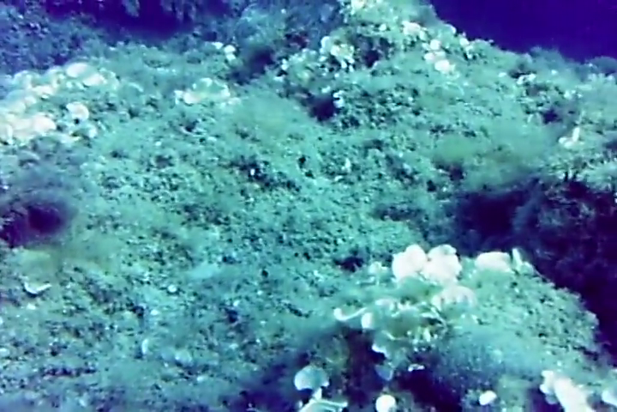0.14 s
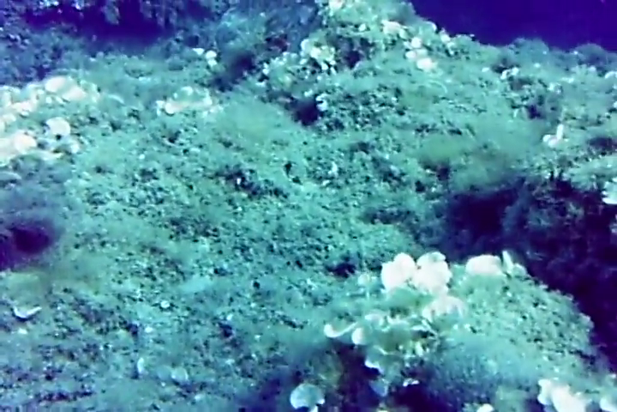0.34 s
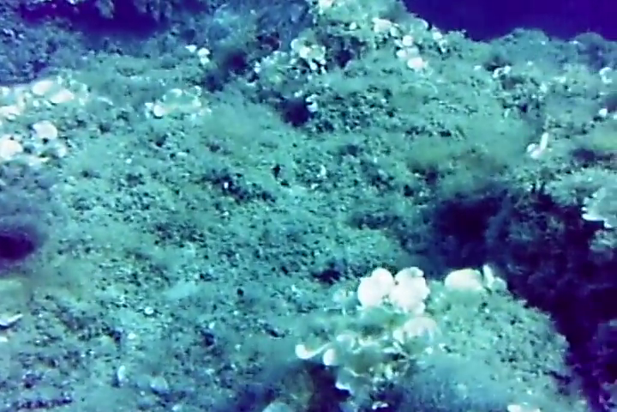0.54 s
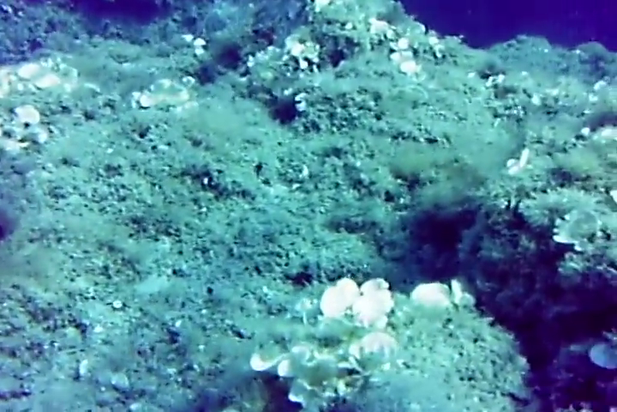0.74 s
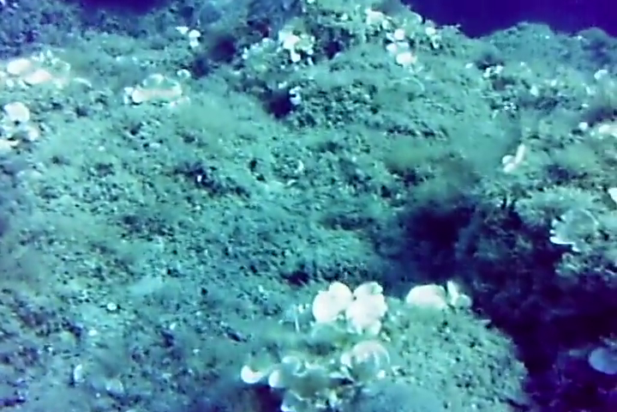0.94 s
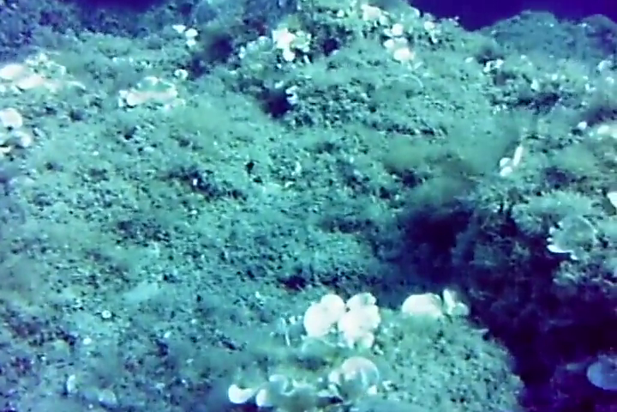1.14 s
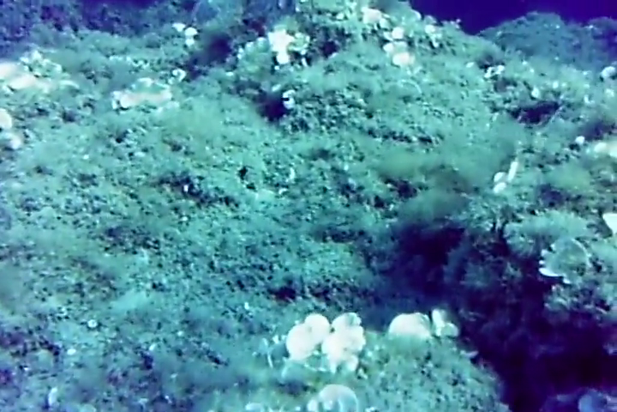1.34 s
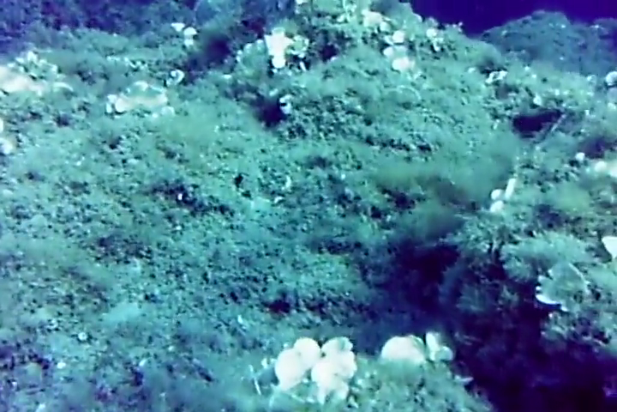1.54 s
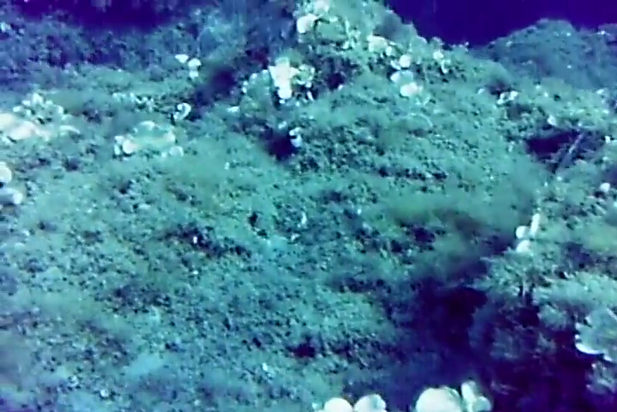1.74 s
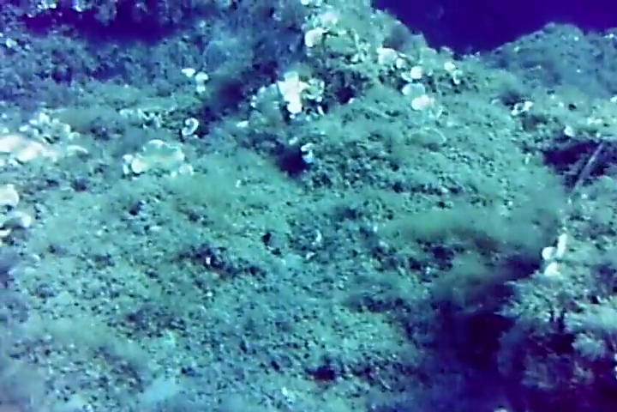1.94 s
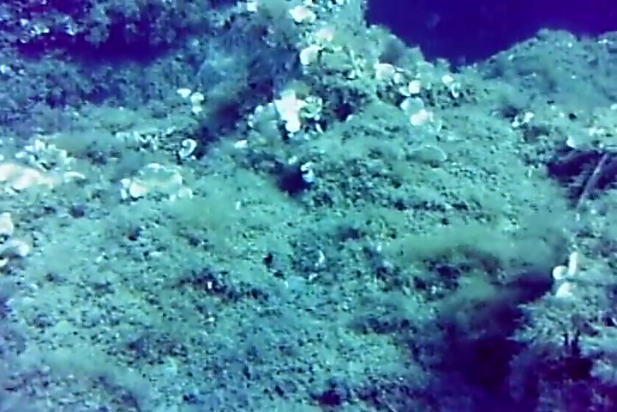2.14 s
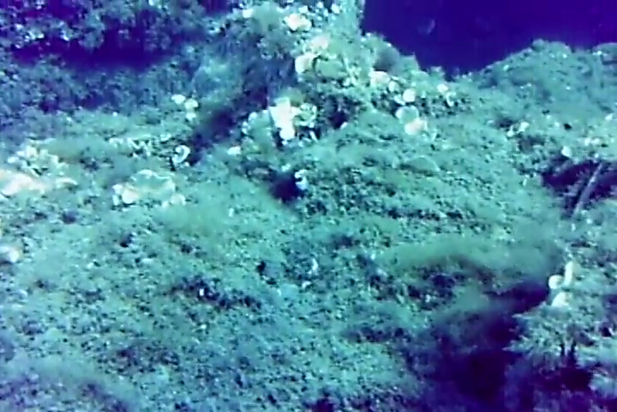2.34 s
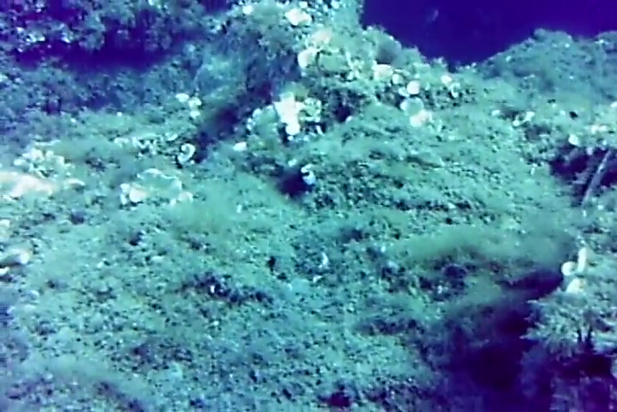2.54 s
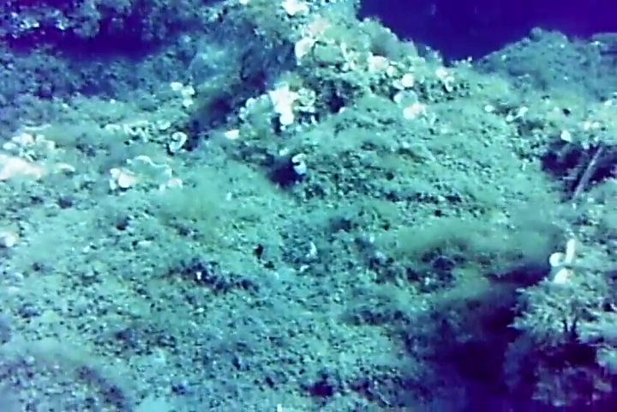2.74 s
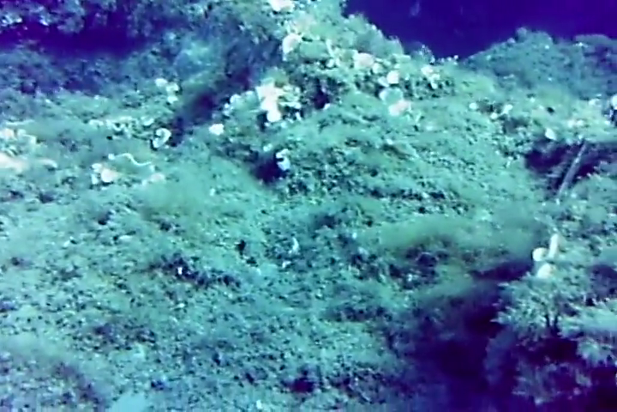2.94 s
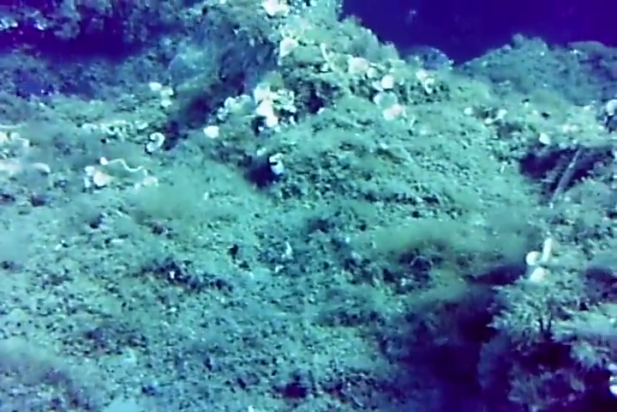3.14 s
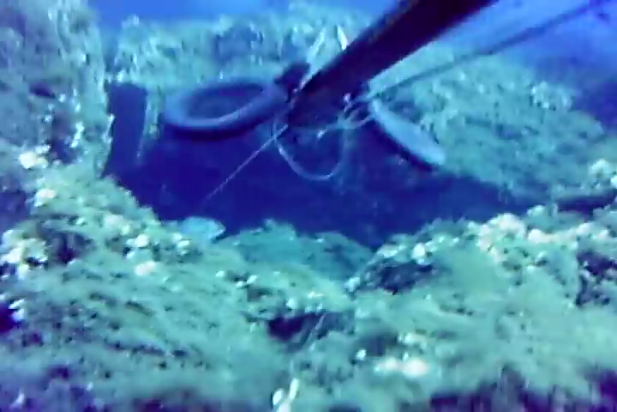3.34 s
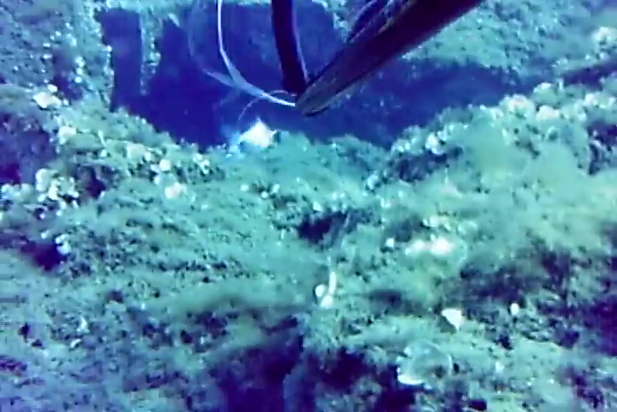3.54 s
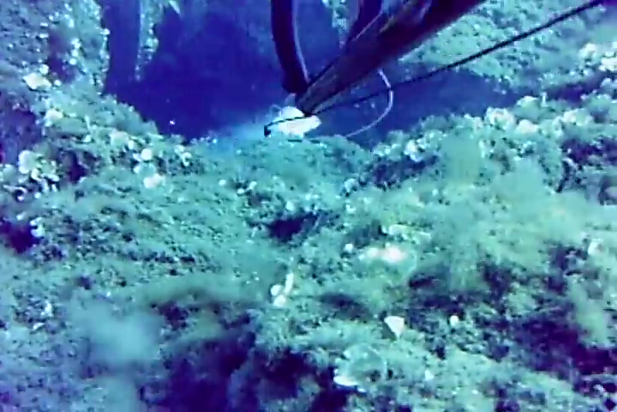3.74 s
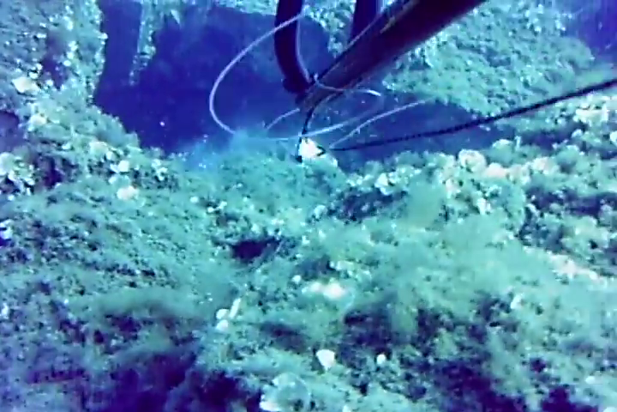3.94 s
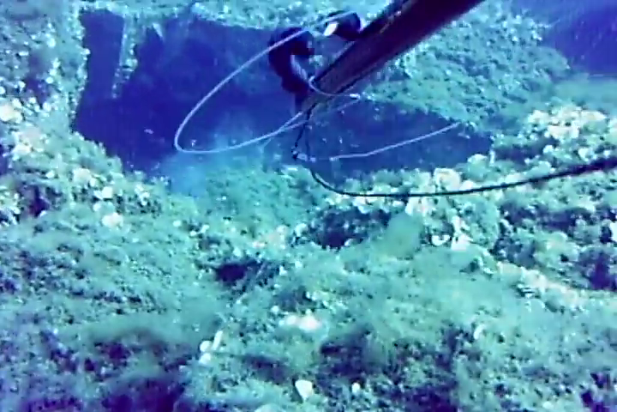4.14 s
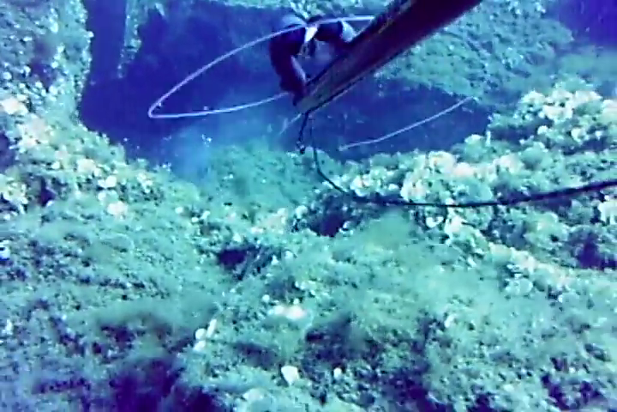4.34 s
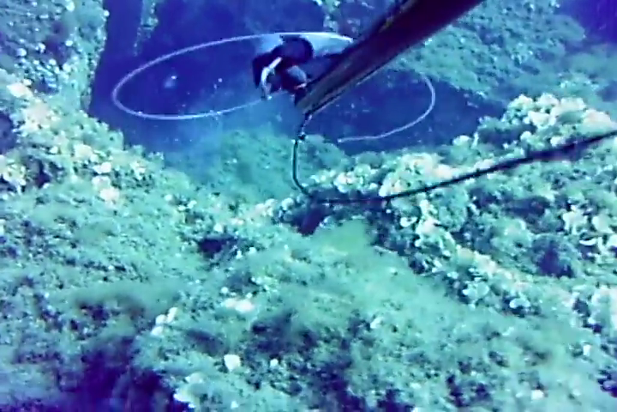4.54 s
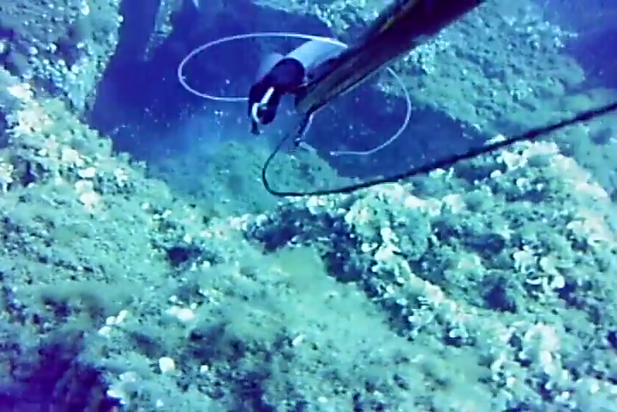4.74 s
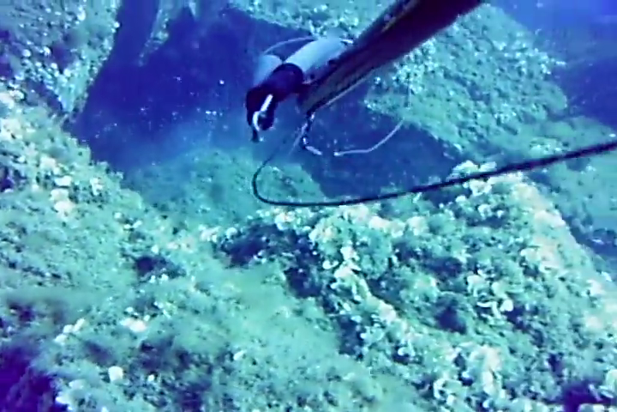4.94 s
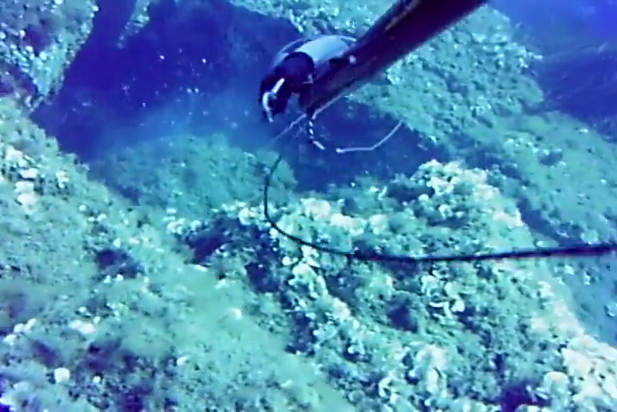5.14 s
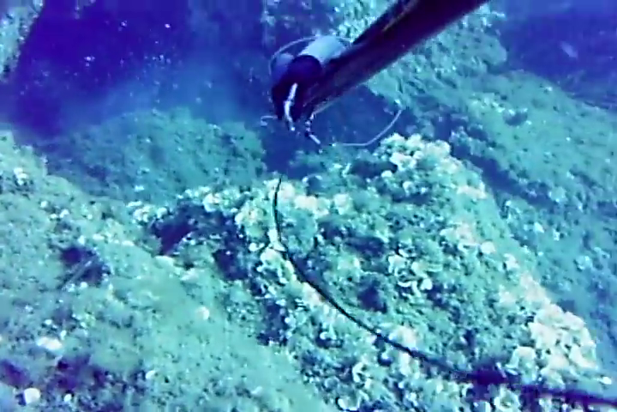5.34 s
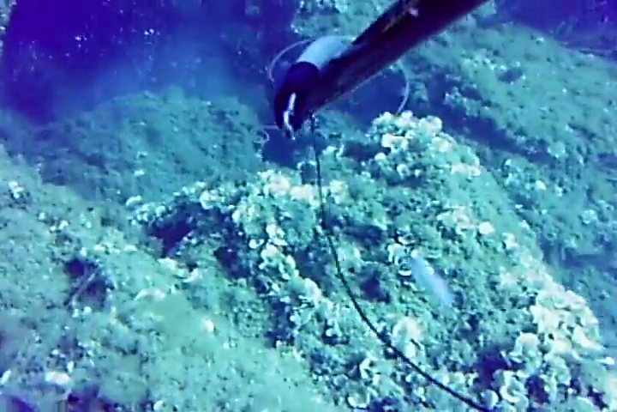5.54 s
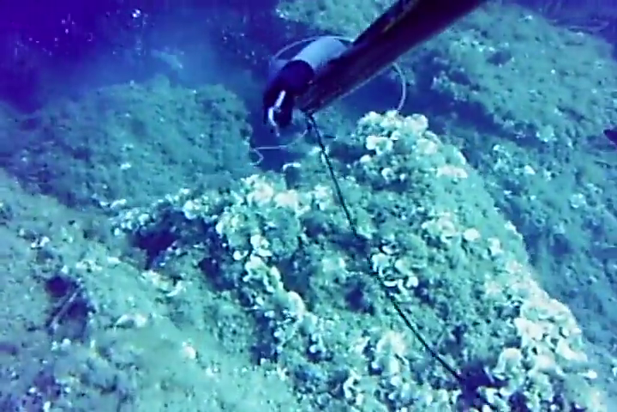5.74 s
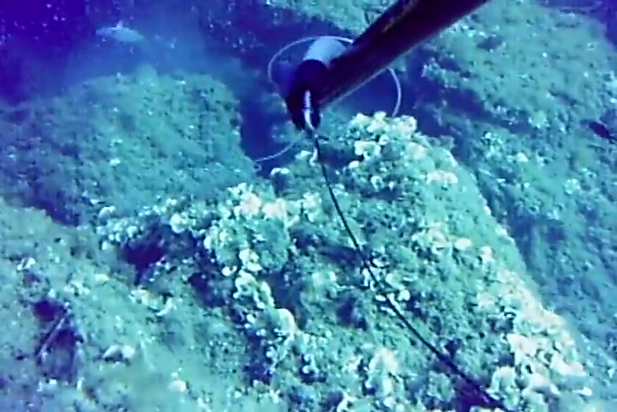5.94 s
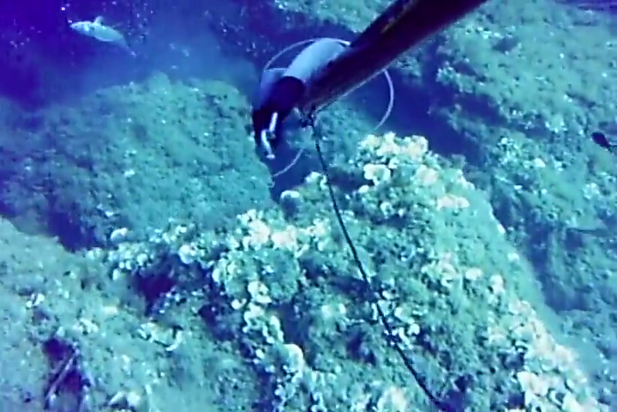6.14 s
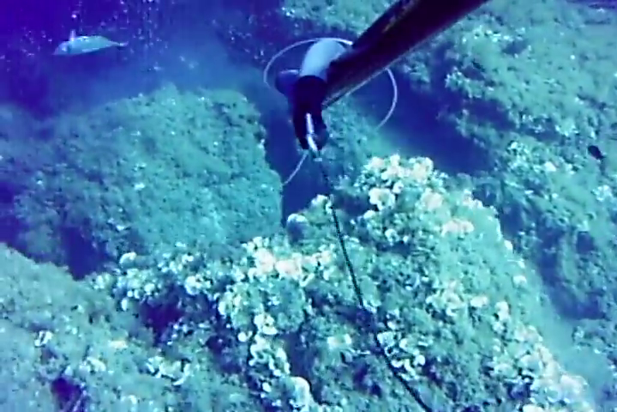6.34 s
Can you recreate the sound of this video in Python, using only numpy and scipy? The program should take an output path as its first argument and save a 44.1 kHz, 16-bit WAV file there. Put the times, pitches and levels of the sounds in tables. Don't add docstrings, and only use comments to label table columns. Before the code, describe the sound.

Heard from inside a sealed camera housing under water: steady thin hiss with faint crackle and sparse plastic ticks, growing busier around one and a half seconds. Just after three seconds a speargun fires beside it, a short clipped crack and rush that overloads the microphone. Slack rubbers slap, then line flicks, little squeaks, rubbing and boxy knocks continue, thinning toward the end.

```python
import sys
import numpy as np
from scipy import signal
from scipy.fft import rfft, irfft
from scipy.io import wavfile
from scipy.ndimage import uniform_filter1d

SR = 44100
rng = np.random.default_rng(int(sys.argv[2]) if len(sys.argv) > 2 else 0)


def elevation(decibels):
    levels = np.asarray(decibels, float)
    return 10 ** (levels / 20)


def wav_record(signal):
    frames = np.transpose(np.atleast_2d(signal))
    bounded = np.clip(frames, -1, 1)
    quanta = np.round(bounded * 32767).astype(np.int16)
    wavfile.write(sys.argv[1], SR, quanta)


N = 286209

# (centre [Hz], width [Hz], level [dB])
THUD = [(277, 33, -5.5), (391.6, 44, -2.5), (538, 25, 4.5)]
BODY = [(770, 120, -3.5), (1191.4, 150, -1), (1320, 115, 1.5)]
TICK = [(2244, 395, -1), (2850, 480, 0.27), (3730, 3000, -1.5)]
# (frequency [Hz], density [dB per Hz])
HISS_SPECTRUM = [(18, -44), (30, 3.5), (336, -5.5), (844, -4), (2200, -7), (4000, -6.5), (5200, -43),
                 (8800, -120)]
# (centre [Hz], width [Hz], level [dB])
HISS_PEAKS = [(520, 28, 0.5), (1300, 160, -8), (1585, 110, -6), (2830, 110, -15), (3275, 81, 0),
              (3900, 45, -23)]
# (time [s], length [s], level [dB], drift [dB over the length], treble [dB])
RUSTLES = [(0.003, 0.056, -38, 2, -11), (0.059, 0.16, -36.5, -1.5, -38.5), (0.237, 0.024, -52, 1, -12),
           (0.981, 0.2, -39, 5, -22), (1.251, 0.0067, -40, 2, -0.5), (1.476, 0.039, -41.5, 8.5, -3),
           (1.531, 0.039, -39.5, -8, 1), (1.985, 0.068, -31, -8, -31), (2.065, 0.13, -43.5, 10, -9),
           (2.975, 0.18, -40, 4, -11.5), (3.1705, 0.018, -20, -11.5, -8), (3.368, .052, -28, -6, 4),
           (3.428, .016, -33, -2, 0), (3.345, .02, -34, -3, 3), (4.056, 0.006, -41, -3, 6),
           (4.086, 0.022, -34.5, -1, 0.5), (4.55, .13, -37.5, 1, -5), (4.99, .12, -36, 0, -4),
           (1.5, .08, -42, 0, 2)]
# (time [s], peak [dB], pitch [Hz], decay t60 [s])
SNAPS = [(.0413, -5.5, 2230, 0.0021), (.0413, -5, 3700, 0.0038), (1.5788, -7.5, 1500, 0.0011),
         (1.6878, -17, 495, 0.0072), (1.688, -11.5, 1930, 0.0013), (6.214, -27, 2800, .004),
         (1.6885, -8.5, 3960, 0.014), (4.5745, -18, 3850, 0.011), (5.583, -21.5, 2900, 0.0073),
         (1.2445, -22, 2000, 0.0012), (1.2995, -24, 2200, 0.0014), (1.5, -23, 2500, 0.0016),
         (1.516, -26, 1800, .0015), (1.196, -27, 900, .012), (1.091, -28, 2900, .006),
         (5.0132, -15, 900, .004), (4.488, -23, 3950, .012), (4.7615, -21, 2500, .0015),
         (4.914, -28, 2100, .004), (4.906, -29, 2400, .006), (4.512, -28, 1700, .01),
         (5.056, -24, 1250, .012), (5.023, -24, 800, .012), (6.4345, -28, 3300, .006),
         (6.4375, -28, 3300, .004), (1.6505, -21, 2200, .0015), (1.7315, -23, 1800, 0.0014),
         (1.486, -28, 1400, .005), (1.493, -26, 1300, .005), (1.535, -24, 1800, .003),
         (1.259, -39, 3300, .008), (6.048, -28, 3000, .006), (5.557, -29, 2900, .004),
         (3.3132, -5, 1500, .002), (3.4775, -27, 2000, .003), (3.6185, -28, 2300, .003),
         (4.052, -24, 3000, .003)]
# (time [s], peak [dB], pitch [Hz], hardness [dB])
EARLY_TICKS = [(0.042, -19, 1320, 9), (0.053, -36, 520, 8), (0.609, -24, 3300, -8), (1.08, -23, 1380, 5),
               (1.2445, -18, 2790, -4), (1.299, -21, 3170, -4), (1.33, -17, 2880, -5),
               (1.337, -15.5, 3500, -2), (1.478, -23, 1340, 6), (1.515, -17, 2860, -8),
               (1.553, -18, 2770, -16), (1.562, -13.5, 2840, 7), (1.579, -9.5, 1022, 25),
               (1.65, -13.5, 3100, -2), (1.656, -18, 2850, -2), (1.688, -9.5, 2860, -9.5),
               (1.731, -17.5, 2860, 3), (1.912, -35.5, 537, -5), (1.976, -28.5, 527, -23),
               (2.187, -18.5, 3000, -1), (2.444, -26, 3320, -11), (2.84, -25.5, 2870, -13),
               (2.992, -30, 590, -27)]
# (time [s], length [s], level [dB], place [octaves above the hum], loss [dB per octave squared])
RUBS = [(3.4, 2.9, -47, 0.38, 5), (3.33, .008, -34.5, 0.5, 1.5), (3.36, 0.22, -40, -0.16, 2.5),
        (3.625, 0.024, -38.5, -1.1, 11), (.1, 0.78, -51, 1.4, 8), (3.94, 0.046, -36.5, 0.8, 4.5),
        (4.082, 0.081, -36, 2.8, 0), (4.216, 0.18, -40.5, 0.7, 3), (4.487, 0.064, -36.5, 1.3, 0),
        (4.592, 0.088, -32.5, 1, 4.5), (4.743, 0.18, -39.5, 0.99, 3), (5.005, 0.15, -37.5, 1.5, 2.5),
        (5.206, 0.077, -46, 0.5, 14.5), (5.46, 0.0084, -41, 0.7, 5.5), (5.59, .01, -38, 0.1, 3.5),
        (5.717, .02, -45, 1, 1.5), (6.023, 0.08, -36, 0.3, 2), (6.095, 0.03, -37, -0.64, 0.5),
        (6.249, .12, -34.5, -0.3, 2.5), (6.48, .02, -37, -0.8, 3.5)]
# (mount centre [Hz], mount width [Hz], share [dB])
MOUNT = [(305, 70, -2), (520, 630, -2.5), (1250, 1400, 0.5), (2203, 3600, -4)]
# (time [s], peak [dB], pitch [Hz], decay t60
# [s])
FLICKS = [(3.5295, -18.5, 900, 0.0074), (3.5705, -24, 935, .01), (3.6175, -20.5, 990, 0.016),
          (4.16, -14.5, 967, 0.014), (5.1284, -6.5, 890, 0.0053), (5.137, -15, 760, 0.01),
          (5.202, -9.5, 895, 0.0076), (3.4235, -19, 620, .015), (3.8215, -30, 370, .04),
          (3.823, -27, 1000, .02), (3.605, -33, 245, .12), (3.52, -36, 250, .1), (3.685, -35, 265, .08),
          (3.55, -32, 430, .06), (3.70, -35, 420, .08), (6.469, -32, 1300, .03), (6.476, -31, 1100, .02),
          (6.485, -27, 700, .03), (3.441, -20, 900, .008), (3.931, -29, 520, .06), (3.956, -26, 1270, .03),
          (4.104, -22, 1000, .03), (5.591, -24, 850, .02), (5.59, -28, 2900, .015), (5.842, -31, 1300, .02),
          (4.212, -32, 525, .1), (4.829, -27, 1250, .03), (4.864, -27, 500, .03), (4.893, -27, 1250, .025),
          (4.876, -29, 1300, .02), (4.932, -29, 1200, .03), (4.571, -27, 1250, .02), (4.14, -33, 130, .1),
          (3.15, -36, 62, .15)]
# (time [s], peak [dB], pitch [Hz],
# hardness [dB])
SLIPS = [(3.1682, -3, 2350, -0.5), (3.4183, -23, 2850, 0), (4.056, -18, 3890, -8), (4.4876, -16, 3000, 8),
         (4.551, -19, 1800, -5.5), (3.589, -31, 3500, 6), (4.761, -17, 3340, 11), (4.8933, -28, 2290, -1.5),
         (4.951, -21, 2160, -15), (4.991, -13, 1740, -5), (4.9938, -16.5, 2240, -10),
         (5.0024, -17.5, 1940, 1), (5.0195, -16.5, 1830, 6), (5.0272, -16, 2300, 3), (5.0446, -15, 2150, 3),
         (5.053, -17.5, 2280, -2), (5.121, -25.5, 2400, 2), (5.128, -21, 2200, -2), (5.203, -25, 2300, 0),
         (4.563, -21, 2200, 1), (4.664, -19, 2000, -4), (4.700, -23, 3200, 5), (5.1434, -19.5, 2220, 7),
         (6.035, -23.5, 3230, 0)]
# (time [s], peak before overload [dB], pitch [Hz], decay t60 [s])
RECOIL = [(3.1925, -4, 1517, 0.013), (3.1944, 21.5, 309.5, 0.026), (3.198, 25, 1317, 0.038),
          (3.2005, 19.5, 411, 0.019), (3.203, 13, 1334, 0.032), (3.2115, 18.5, 610, 0.025),
          (3.216, 22, 1112, 0.022), (3.2195, 17, 545.4, .03), (3.2235, 20, 2895, 0.02),
          (3.226, 20, 3800, 0.02), (3.229, 19.5, 3605, .015), (3.256, 9.5, 4020, .015),
          (3.2655, 0, 604, .03), (3.268, -2, 1151, .012), (3.2322, 25, 253.4, 0.012),
          (3.237, 23.5, 1150, 0.04), (3.2465, 19, 1200, 0.03), (3.251, 14.5, 580, 0.052),
          (3.259, 11.5, 289.5, 0.022), (3.26, -14, 1197, 0.05), (3.271, 1, 2315, 0.025),
          (3.2824, 6, 1295, 0.046), (3.2945, 7, 520, 0.01), (3.299, -11, 963, 0.025),
          (3.3035, -11, 560, 0.039), (3.3065, -6, 620, .04), (3.3127, 5, 704, 0.0076),
          (3.3155, -3, 600, .04), (3.302, -17, 3900, .03), (3.3255, 4, 1193, 0.016),
          (3.327, -5, 2325, 0.013), (3.34, -17, 2450, 0.02)]
# (time [s], length [s], level before overload [dB], drift [dB over the length])
GUSTS = [
    (3.1982, 0.034, 19, 0.5),
    (3.238, 0.022, 17, -6),
    (3.286, 0.0096, 8, -13.5),
    (3.277, .005, -16, -0.5),
    (3.301, 0.022, -10, -1.5),
    (3.333, .012, -17, -1),
    (3.369, 0.043, -20, -18),
    (3.423, 0.022, -19.5, -5.5),
]
# (time [s], level [dB])
SURGE = [
    (3.193, 0),
    (3.196, 14),
    (3.262, 12),
    (3.274, 0),
    (3.282, 0),
    (3.284, 6),
    (3.293, 0),
]
# (time [s], peak [dB], pitch [Hz], hardness [dB])
REBOUNDS = [
    (3.375, -5, 1337, -1),
    (3.44, -26, 704, -9),
    (3.529, -20, 752, -10),
    (3.617, -21, 750, -16),
]
# (centre time [s], peak [dB], pitch [Hz], half length [s])
SQUEAKS = [(3.380, -18, 2275, 0.004), (3.4294, -16, 1300, 0.004), (3.431, -17, 550, 0.011),
           (3.958, -27, 1275, 0.004), (3.9645, -28, 1275, .004), (4.207, -23.5, 1250, 0.0062),
           (4.3745, -22.5, 1300, 0.0044), (4.4915, -15, 1275, 0.0045), (4.508, -29, 525, 0.019),
           (4.517, -24, 1200, 0.0044), (4.545, -24, 1200, 0.0046), (4.557, -19.5, 1300, .005),
           (4.5945, -21.5, 1225, .004), (4.603, -24, 1230, .005), (4.613, -22, 1250, 0.0045),
           (4.6215, -20, 1300, 0.0045), (4.635, -10.5, 1225, .0035), (4.6515, -15, 1200, 0.0036),
           (4.6695, -15.5, 1225, 0.0043), (4.682, -19, 1250, 0.0078), (4.593, -29, 2250, 0.0073),
           (4.629, -25.5, 2250, 0.0066), (4.648, -27, 2250, 0.0027), (4.763, -28.5, 525, 0.025),
           (4.7785, -21, 1300, .004), (4.996, -21.5, 1300, .003), (5.021, -23, 1000, .005),
           (5.046, -24.5, 1250, .003), (5.06, -28, 1250, .004), (5.0743, -13, 2175, .004),
           (5.093, -17.5, 1900, .003), (5.0935, -22, 1050, .003), (5.101, -17, 2200, 0.0029),
           (5.179, -27, 1200, 0.0029), (5.5915, -25, 575, 0.008), (5.733, -33, 1250, .008),
           (5.781, -29, 1250, .004), (5.887, -32.5, 1250, 0.005), (6.010, -29, 525, 0.018),
           (6.071, -29.5, 1200, .004), (6.109, -24.5, 575, .004), (6.1155, -21.5, 1225, .004),
           (6.125, -24, 1225, 0.0044), (6.227, -25, 1225, .003), (6.239, -25.5, 1225, .004),
           (6.263, -28.5, 500, .004), (6.292, -25, 525, .01), (6.344, -22, 1200, .005),
           (6.348, -27.5, 550, 0.0048), (6.358, -29, 1200, .005)]
# (centre time [s], peak [dB], pitch [Hz], half length [s])
MORE_SQUEAKS = [(3.460, -28, 526, .008), (3.481, -18.5, 800, 0.0042), (3.4829, -18.5, 1275, .003),
                (3.482, -32, 2300, .003), (3.500, -28.5, 500, .008), (3.519, -30, 1300, .004),
                (3.531, -33, 2800, 0.0027), (3.563, -28, 520, .008), (3.564, -31, 1300, 0.0036),
                (3.575, -20.5, 773, .006), (3.594, -33, 449, .008), (3.665, -33, 285, 0.016),
                (3.697, -21, 523.5, 0.0058), (3.722, -34, 523, 0.016), (3.782, -34, 527, .014),
                (3.8258, -21, 1275, .006), (3.829, -26, 750, 0.0066), (3.847, -29, 525, 0.011),
                (3.872, -34, 2900, 0.0036), (3.938, -27, 1280, .008), (3.957, -25.5, 526, 0.017),
                (3.986, -24, 525.5, 0.019), (3.974, -31, 900, 0.014), (4.061, -27, 4000, .004),
                (4.096, -26, 2290, .005), (4.205, -32, 850, .008), (4.365, -31.5, 2290, 0.0068),
                (4.742, -29, 1280, .006), (4.732, -29, 1250, .005), (4.762, -26, 1300, .004),
                (4.808, -26, 853, .006), (5.014, -22, 779, .003), (5.150, -27.5, 800, .008),
                (5.211, -22, 800, .006), (6.102, -32.5, 2270, .01), (6.128, -29, 775, .006),
                (6.196, -32, 1200, .004), (6.260, -35, 1230, 0.0033), (6.376, -30, 1200, .004),
                (6.473, -33, 1300, .005)]
# (time [s], peak [dB], pitch [Hz], decay t60 [s])
BUMPS = [
    (4.078, -18.5, 1080, 0.06),
    (4.079, -12, 255, 0.15),
    (4.086, -15, 520, 0.062),
    (4.0908, -12.5, 254, 0.081),
    (4.096, -13.5, 1333, 0.05),
    (4.100, -19, 774, 0.059),
    (4.108, -7, 544, 0.022),
    (4.110, -17, 1320, 0.091),
    (4.2935, -11.5, 534, 0.031),
    (4.2945, -8, 1277, 0.019),
]
# (time [s], peak [dB], pitch [Hz], hardness [dB])
KNOCKS = [
    (4.160, -17.5, 840, -10),
    (4.359, -18.5, 1060, -11.5),
    (4.424, -27.5, 1200, -13.5),
    (4.796, -22, 840, -18),
    (4.864, -31, 1320, -2),
    (5.131, -20.5, 700, -16),
    (5.207, -16.5, 834, -23),
    (5.583, -10, 1250, -9.5),
    (6.235, -29, 540, -6),
]


def resonate(x, hz, width):
    return signal.lfilter(*signal.iirpeak(hz, hz / width, fs=SR), x)


def housing(x, modes):
    return sum((-1) ** k * elevation(db) * resonate(x, hz, w) for k, (hz, w, db) in enumerate(modes))


def unit(x):
    return x / np.sqrt(np.mean(x ** 2))


def curve(rows, off_db):
    s, db = np.transpose(rows)
    return elevation(np.interp(np.arange(N) / SR, s, db, left=off_db, right=off_db))


def walk(rate):
    k = int(SR / rate)
    held = np.repeat(rng.standard_normal(N // k + 1), k)
    return 1.66 * uniform_filter1d(held, k)[:N]


def grains(rate, spread_db):
    hit = rng.random(N) < rate / SR
    size = rng.exponential(size=N)
    sign = np.sign(rng.standard_normal(N))
    return hit * elevation(spread_db * np.minimum(size, 3)) * sign


def steady(x, span_s, share):
    power = uniform_filter1d(x ** 2, int(span_s * SR)) + 1e-12
    return x / power ** (share / 2)


def stroke(s, length, db, drift_db, rise_s, fall_s):
    end, end_db = s + length, db + drift_db
    return curve([(s - rise_s, db - 60), (s, db), (end, end_db), (end + fall_s, end_db - 60)], -150)


def add(out, s, x):
    i = int(s * SR)
    out[i:i + len(x)] += x[:N - i]


def ring(hz, t60, rise, wobble):
    t = np.arange(4096) / SR
    drift = uniform_filter1d(rng.standard_normal(4096), size=64) * 8
    envelope = (1 - np.exp(-t / rise)) ** 2 * 1000. ** (-t / t60)
    x = envelope * np.sin(2 * np.pi * hz * np.cumsum(1 + wobble * drift) / SR)
    return x / np.abs(x).max()


def blows(rows, rise, wobble):
    out = np.zeros(N)
    for s, db, hz, t60 in rows:
        add(out, s, elevation(db) * ring(hz, t60, rise, wobble))
    return out


def taps(events, thud_db, body_db, octave_db, dulling, contact_s, cycles, rise_cycles, ring_db):
    out, t = np.zeros(N), np.arange(4096) / SR
    centres = np.array([THUD[1][0], BODY[1][0]])
    for s, db, hz, hard_db in events:
        push = rng.standard_normal(4096) * t * np.exp(-t / contact_s)
        x = elevation(ring_db) * ring(hz, cycles / hz, rise_cycles / hz, .05)
        far_db = octave_db * np.abs(np.log2(hz / centres)) + dulling * hard_db
        shares = (thud_db - far_db[0], body_db - far_db[1], hard_db)
        for share_db, modes in zip(shares, (THUD, BODY, TICK)):
            part = housing(push, modes)
            x = x + elevation(share_db) * part / np.abs(part).max()
        add(out, s, elevation(db) * x / np.abs(x).max())
    return out


def hiss():
    hz, db = np.transpose(HISS_SPECTRUM)
    f = np.fft.rfftfreq(N, 1 / SR)
    colour = elevation(np.interp(np.log(f + 1), np.log(hz), db))
    colour /= np.sqrt(np.mean(colour[(f > 2700) & (f < 3900)] ** 2) * 1200 / (SR / 2))
    throb = 1 + 0.28 * np.sin(2 * np.pi * 29.9 * np.arange(N) / SR)
    source = throb * elevation(1.96 * walk(90)) * rng.standard_normal(N)
    source = source + elevation(-4.0) * unit(grains(550, 2.7))
    plain = irfft(rfft(unit(source)) * colour, N)
    peaks = sum(elevation(db) * resonate(plain, hz, w) for hz, w, db in HISS_PEAKS)
    duck_s, duck_db, recover_s = 3.45, -8, 0.28
    since = np.arange(N) / SR - duck_s
    gain_db = -45.5 + (since > 0) * duck_db * np.exp(-(since / recover_s) ** 2)
    return elevation(gain_db) * (plain + peaks)


def rustle():
    rise_s, fall_s = 0.019, .025
    grit = grains(2500, 2.7) * elevation(2.0 * walk(80))
    dull, bright = unit(resonate(grit, 800, 1300)), unit(resonate(grit, 3000, 2220))
    out = 0
    for *row, treble_db in RUSTLES:
        out = out + stroke(*row, rise_s, fall_s) * elevation(-2.5) * (dull + elevation(treble_db) * bright)
    return out


def snaps():
    return blows(SNAPS, rise=0.00015, wobble=0)


def early_ticks():
    return taps(EARLY_TICKS, thud_db=-4, body_db=-7.5, octave_db=9, dulling=0.22,
                contact_s=0.00029, cycles=26, rise_cycles=1.0, ring_db=-4.5)


def rubbing():
    rise_s, fall_s = 0.11, 0.16
    out = 0
    gestures = [stroke(s, length, db, 0, rise_s, fall_s) for s, length, db, *_ in RUBS]
    for modes, (hz, width, share_db) in zip((THUD[:1], THUD[1:], BODY, TICK[:2]), MOUNT):
        octave = np.log2(hz / MOUNT[1][0])
        press = 0
        for gesture, (*_, place, loss_db) in zip(gestures, RUBS):
            press = press + gesture * elevation(share_db - loss_db * (octave - place) ** 2)
        grit = housing(grains(1500, 1.6) * elevation(1.7 * walk(70)), modes)
        out = out + press * unit(steady(resonate(grit, hz, width), 0.05, 0.85))
    return out


def flicks():
    return blows(FLICKS, rise=0.001, wobble=0)


def slips():
    return taps(SLIPS, thud_db=-11, body_db=-2.6, octave_db=0, dulling=-0.13,
                contact_s=0.0013, cycles=20, rise_cycles=2.6, ring_db=2.5)


def shot():
    rise_s, fall_s = .008, .028
    noise = rng.standard_normal(N) * elevation(3 * walk(250))
    rush = elevation(-8.0) * unit(housing(noise, TICK))
    rush = rush + elevation(-4.0) * unit(housing(noise, BODY))
    rush = rush + elevation(-3.5) * unit(housing(noise, THUD))
    rush = rush + elevation(-18.5) * unit(resonate(noise, 65, 50))
    rush = rush + elevation(-5.5) * unit(resonate(noise, 800, 900))
    gusts = sum(stroke(*row, rise_s, fall_s) for row in GUSTS)
    recoil = blows(RECOIL, rise=0.0007, wobble=0.07)
    return curve(SURGE, -2.0) * (recoil + gusts * unit(rush))


def sway():
    swell = unit(resonate(rng.standard_normal(N), 62.4, 35))
    return stroke(3.2, 0.28, -24.5, -25, rise_s=.01, fall_s=.2) * swell


def rebounds():
    return taps(REBOUNDS, thud_db=1, body_db=-6.5, octave_db=8.5, dulling=-0.2,
                contact_s=0.0026, cycles=24, rise_cycles=0.91, ring_db=-4.5)


def squeaks():
    out, t = np.zeros(N), (np.arange(4096) - 2048) / SR
    for s, db, hz, half in SQUEAKS + MORE_SQUEAKS:
        rasp = rng.standard_normal((2, 4096))
        drift, grit = uniform_filter1d(rasp, size=64) * 8
        tone = np.sin(2 * np.pi * hz * np.cumsum(1 + 0.034 * drift) / SR) * elevation(2.1 * grit)
        breath = elevation(-15) * unit(resonate(rasp[0], hz, 1.2 * hz))
        bell = np.exp(-(t / half) ** 2)
        add(out, s + t[0], elevation(db) * (bell ** 2 * tone + bell * breath))
    return out


def bump():
    return blows(BUMPS, rise=0.0012, wobble=0.035)


def gun_knocks():
    return taps(KNOCKS, thud_db=-10.5, body_db=-10, octave_db=8, dulling=0.63,
                contact_s=0.0026, cycles=24, rise_cycles=.8, ring_db=-0.086)


def scene():
    before = hiss() + rustle() + snaps() + early_ticks() + rubbing()
    firing = flicks() + slips() + shot() + sway()
    after = rebounds() + squeaks() + bump() + gun_knocks()
    return (before + firing + after)[None]


def top_cut(x):
    return signal.sosfilt(signal.butter(12, 15900, fs=SR, output="sos"), x)


def record(dry):
    up, down = 441, 80
    offset, rail, knee, ceiling = -.052, 0.64, 0.69, .725
    x = signal.resample_poly(dry, down, up, axis=1, window=("kaiser", 2.5))
    x = np.clip(x + offset + 0.0041 * walk(4.8)[:x.shape[1]], -rail, rail)
    smooth = signal.firwin(numtaps=19845, cutoff=4110, window=("kaiser", 8.5), fs=SR * down)
    x = signal.resample_poly(x, up, down, axis=1, window=smooth, padtype="mean")[:, :N]
    over = np.maximum(np.abs(x) - knee, 0)
    room = ceiling - knee
    x = x - np.sign(x) * (over - room * np.tanh(over / room))
    x = signal.sosfiltfilt(signal.ellip(8, .1, 50, 15800, fs=SR, output="sos"), x)
    return top_cut(x)


dry = scene()
out = record(dry)
wav_record(out)
```